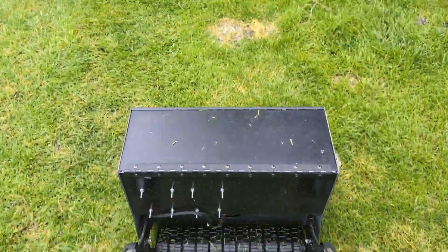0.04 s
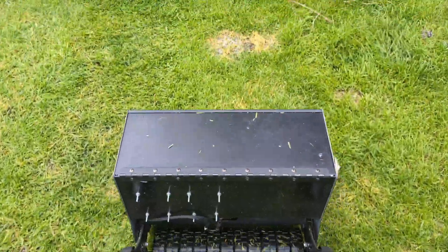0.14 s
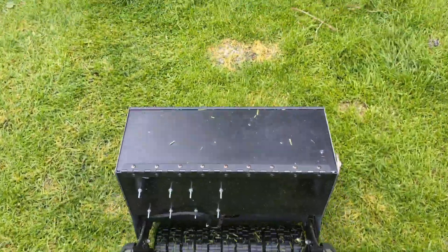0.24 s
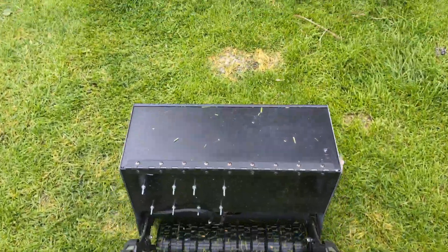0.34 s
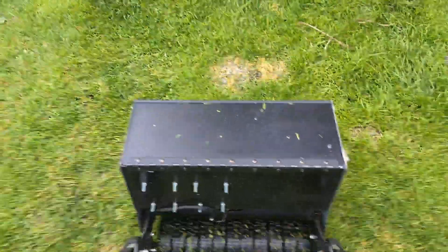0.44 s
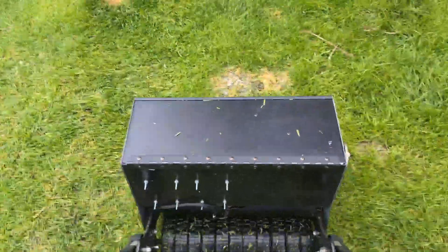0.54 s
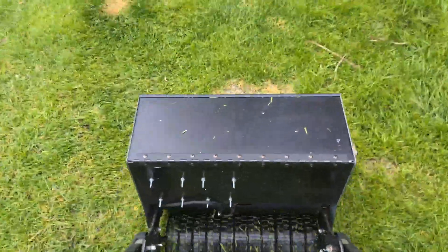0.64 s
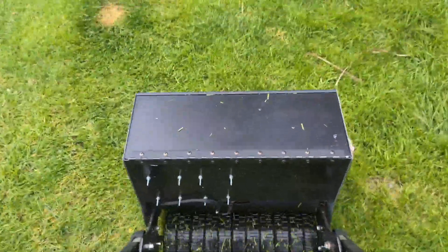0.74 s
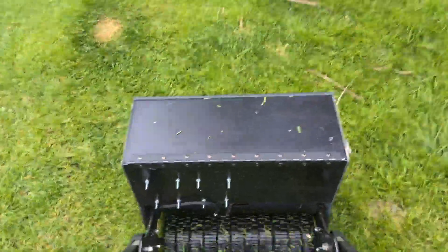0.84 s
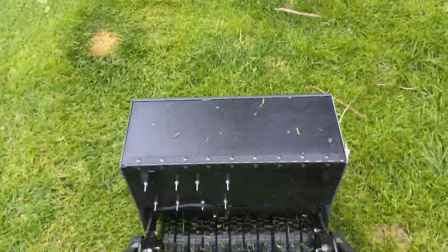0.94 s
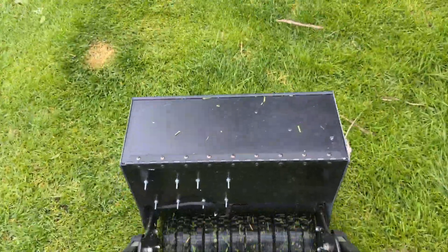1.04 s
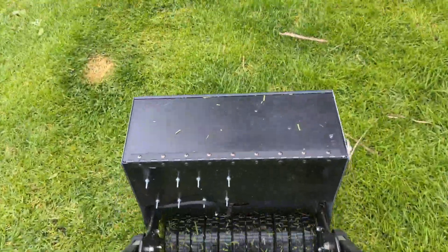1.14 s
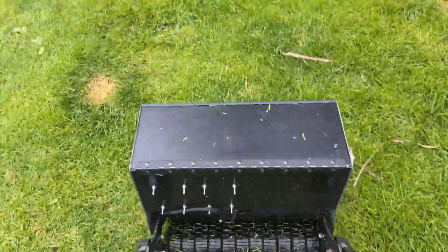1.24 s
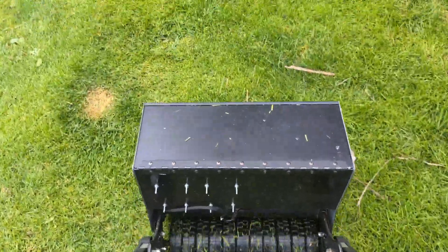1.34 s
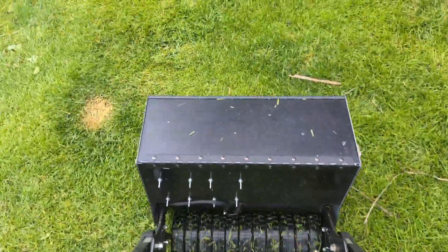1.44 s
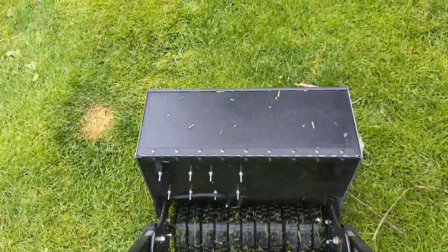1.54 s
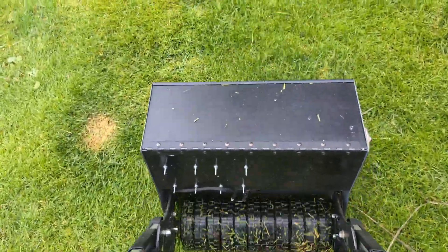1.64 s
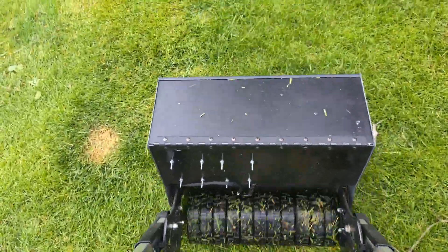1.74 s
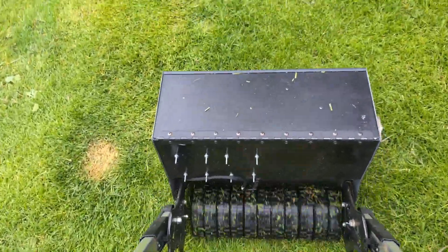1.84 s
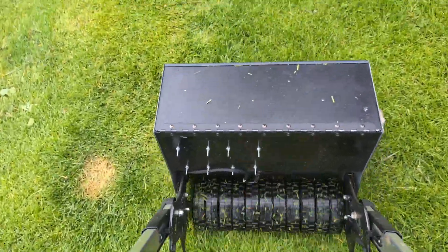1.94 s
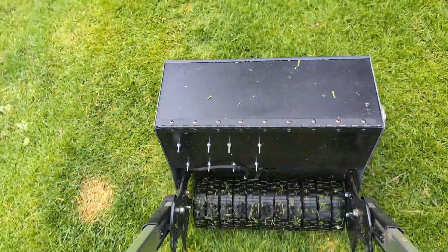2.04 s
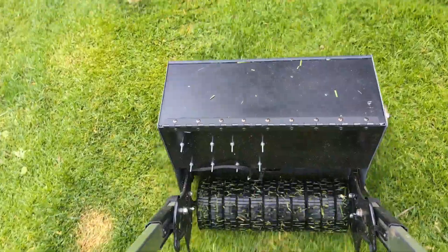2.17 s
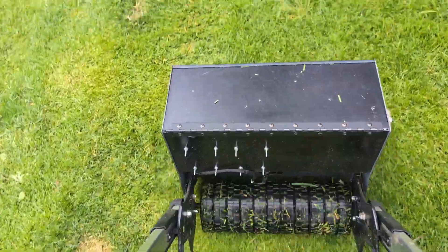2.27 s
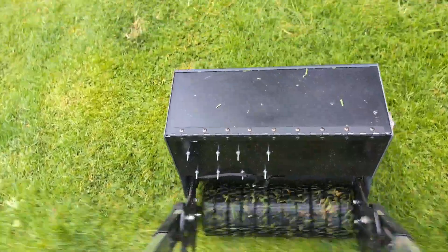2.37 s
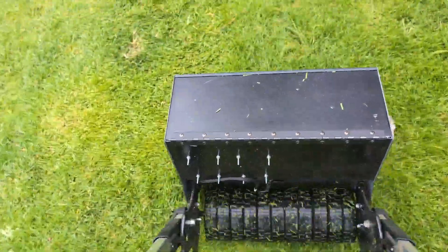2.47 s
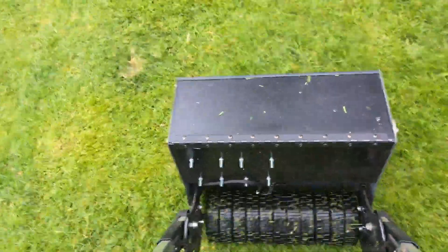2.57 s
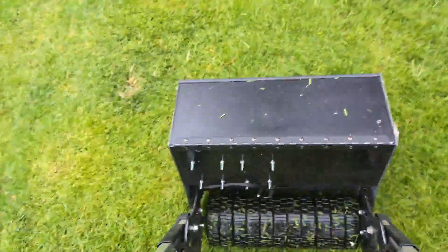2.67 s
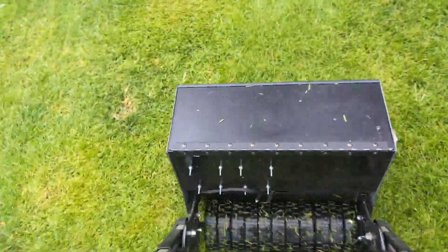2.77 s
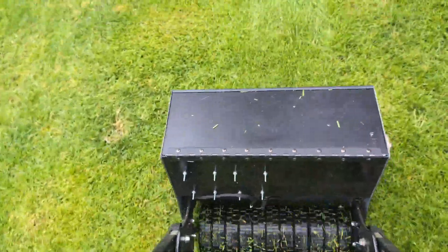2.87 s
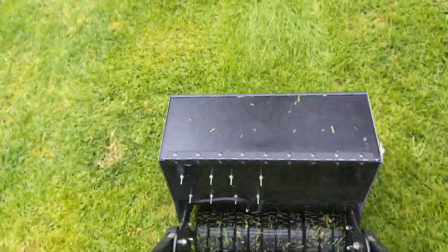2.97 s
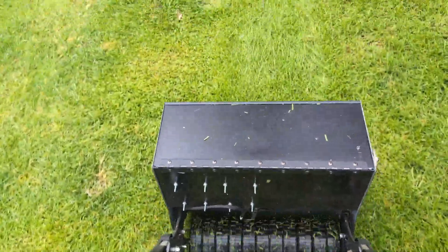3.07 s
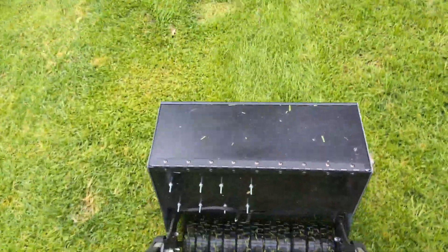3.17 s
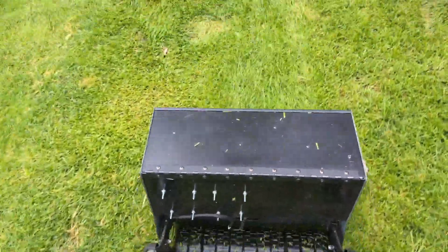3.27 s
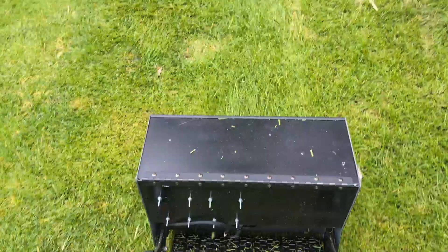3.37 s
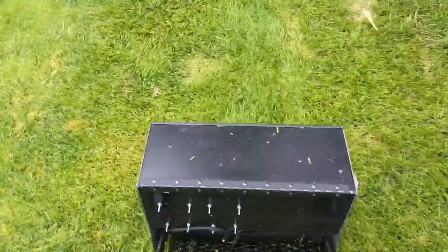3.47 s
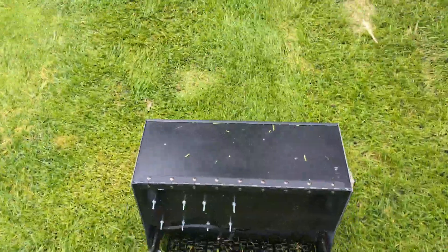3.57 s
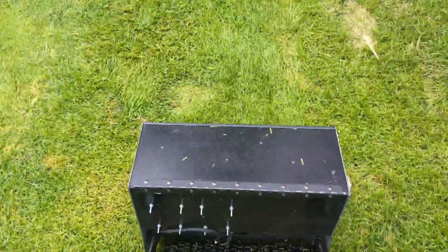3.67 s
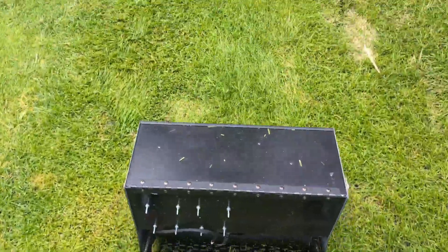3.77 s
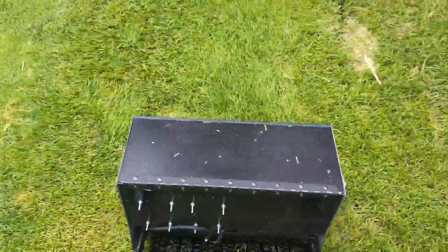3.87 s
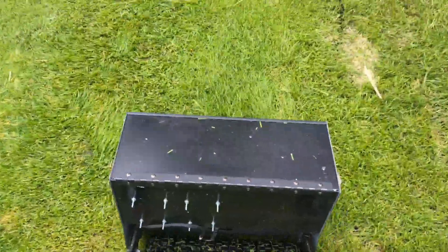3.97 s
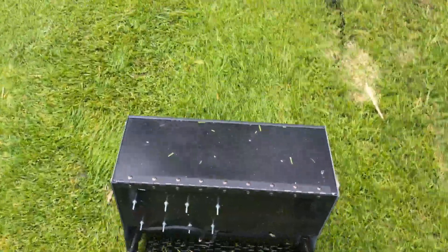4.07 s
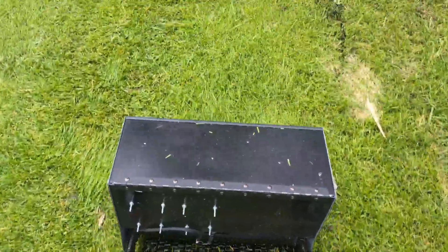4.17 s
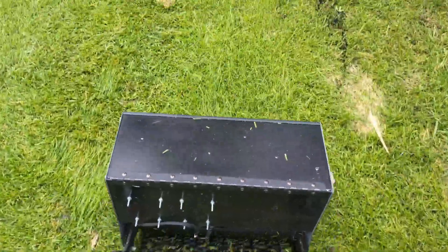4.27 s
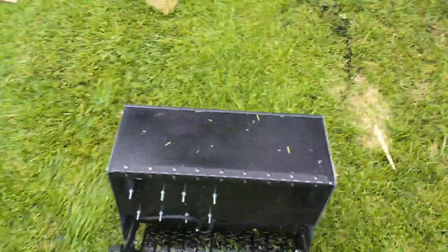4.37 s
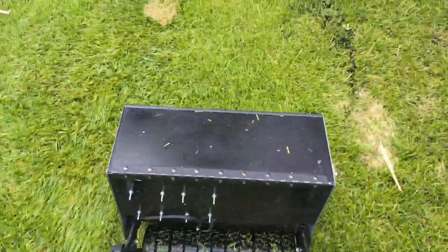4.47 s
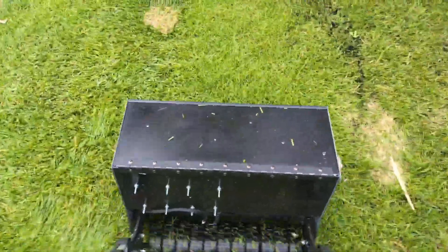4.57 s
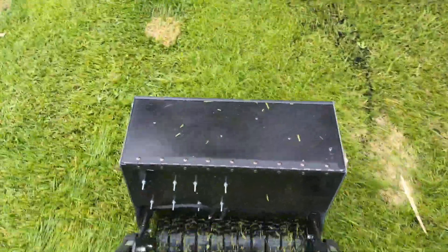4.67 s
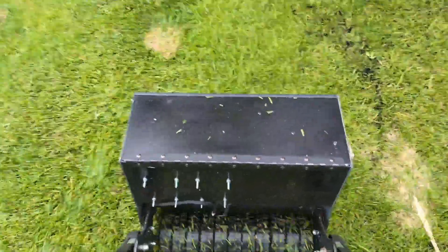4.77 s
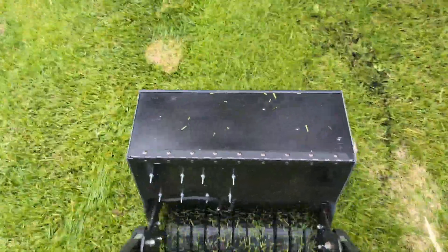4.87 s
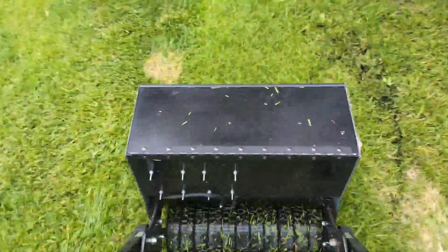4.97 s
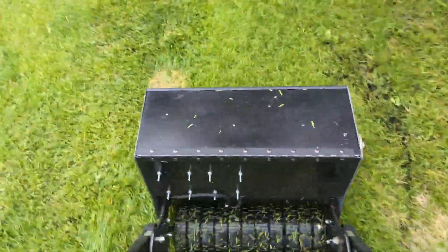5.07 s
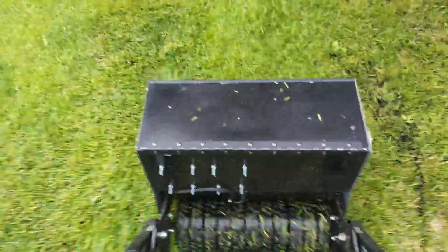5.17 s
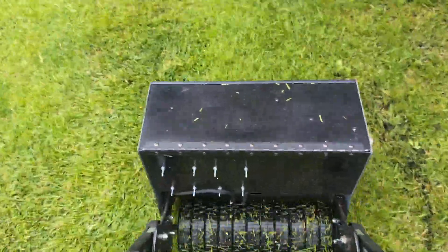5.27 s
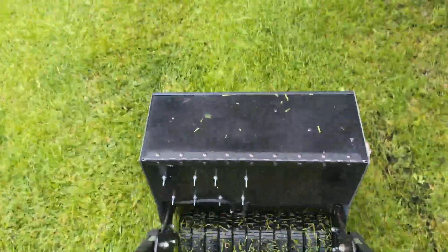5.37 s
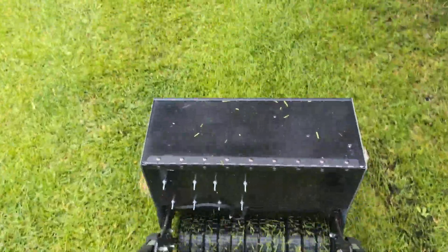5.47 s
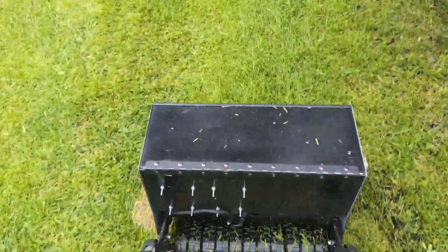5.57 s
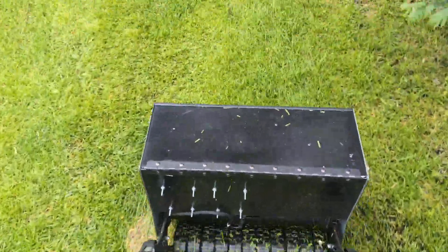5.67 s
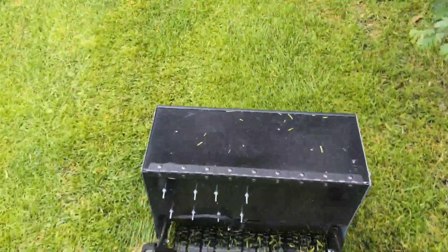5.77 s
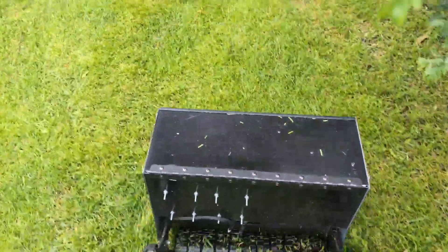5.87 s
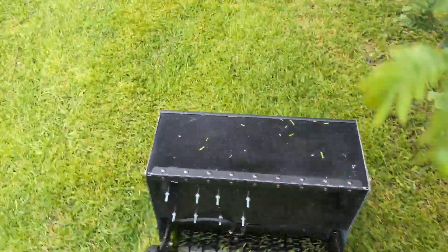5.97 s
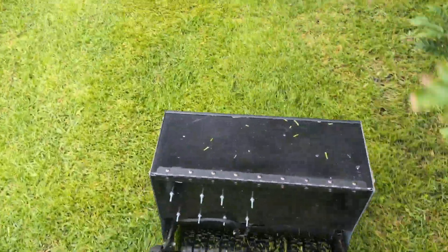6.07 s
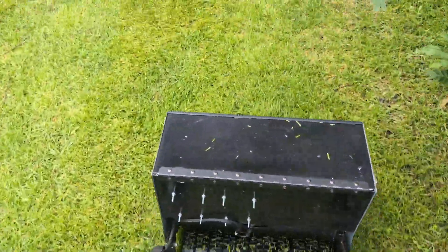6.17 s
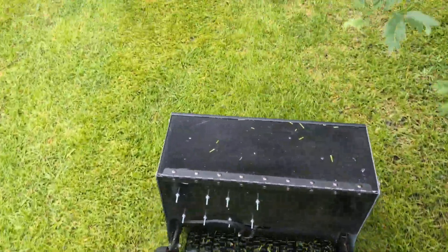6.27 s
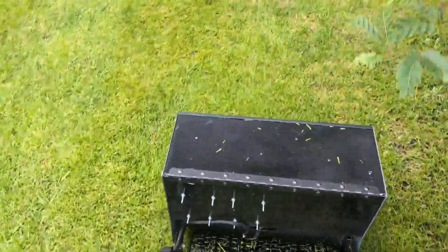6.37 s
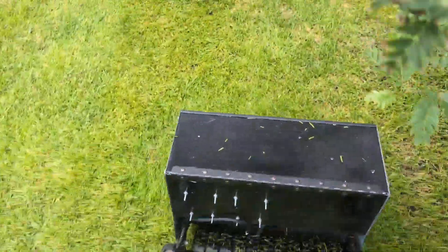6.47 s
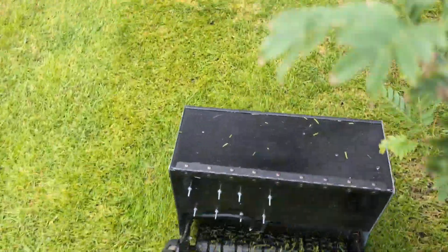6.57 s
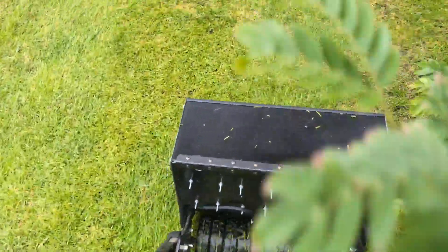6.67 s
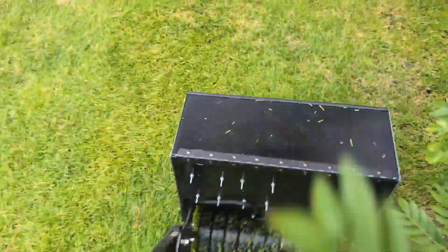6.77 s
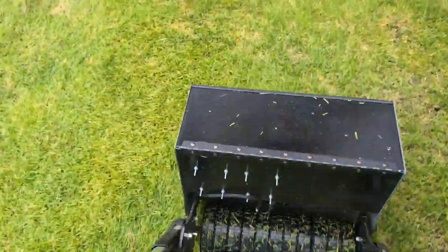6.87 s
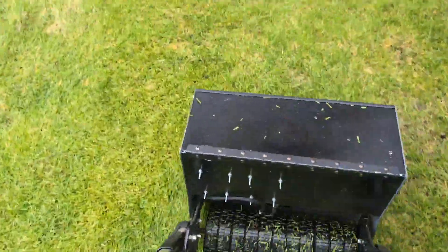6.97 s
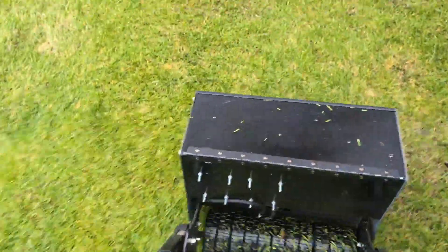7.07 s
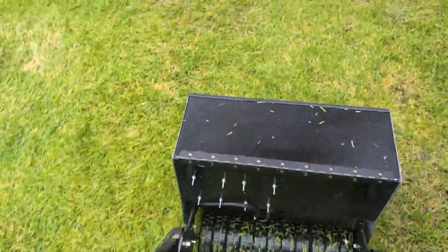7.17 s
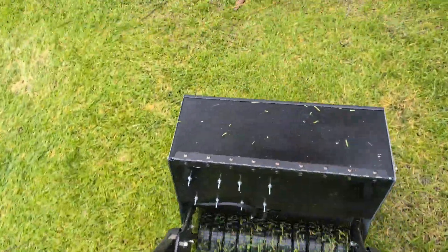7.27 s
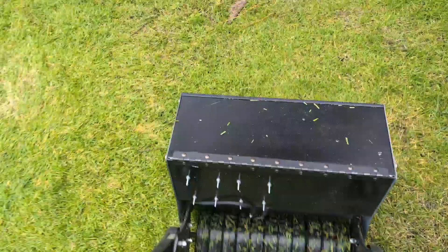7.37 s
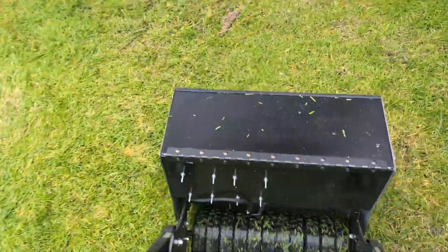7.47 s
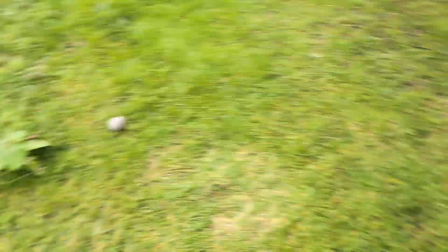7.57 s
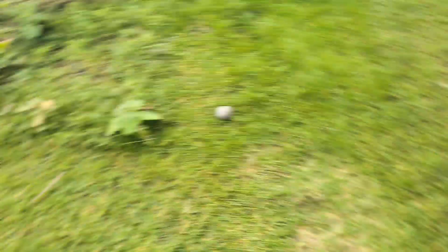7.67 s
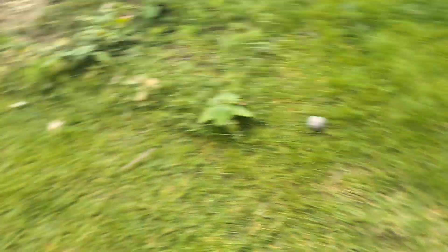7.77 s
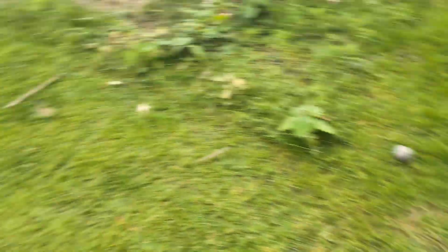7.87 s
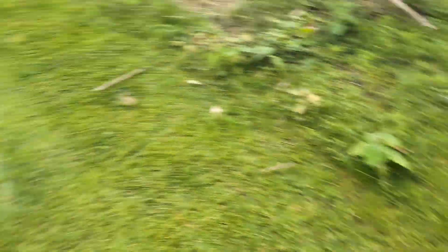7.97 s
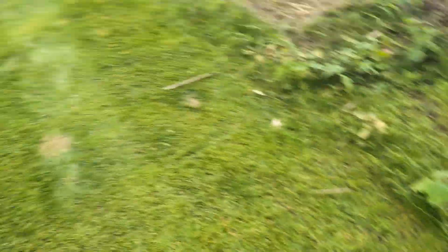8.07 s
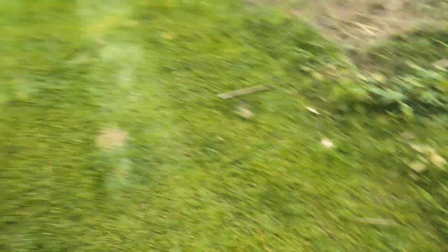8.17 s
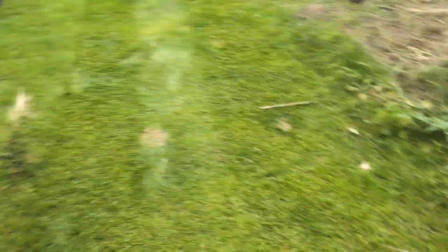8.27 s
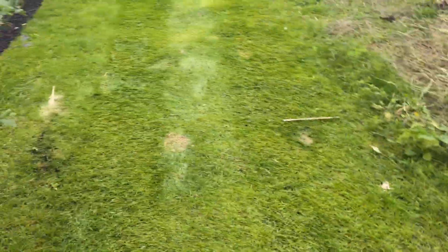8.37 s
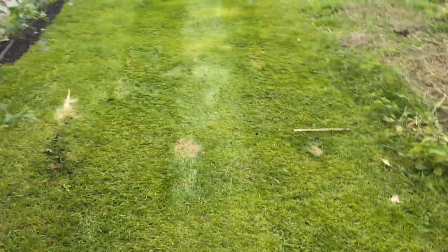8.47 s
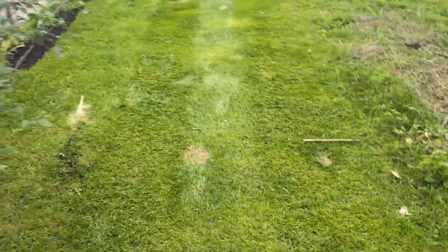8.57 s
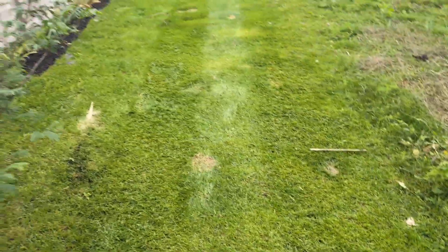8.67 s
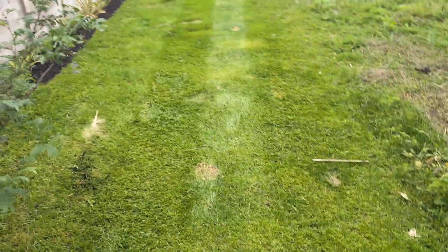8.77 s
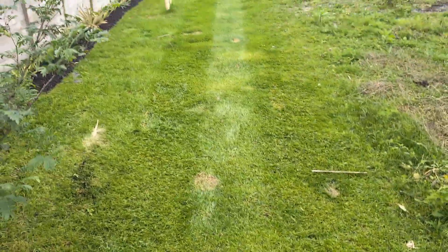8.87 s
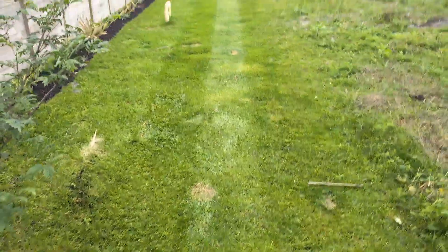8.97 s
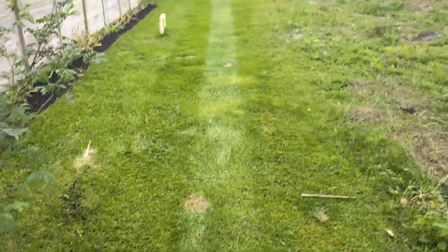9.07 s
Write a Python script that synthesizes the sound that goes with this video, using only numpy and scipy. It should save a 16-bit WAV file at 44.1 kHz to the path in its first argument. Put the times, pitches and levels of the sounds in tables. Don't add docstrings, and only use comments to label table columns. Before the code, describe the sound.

A motor-driven reel mower whirs and rattles loudly over grass, then stops dead with a clack, leaving faint birds and rustling steps.

```python
import sys
import numpy as np
from scipy import signal
from scipy.fft import rfft, irfft
from scipy.io import wavfile
from scipy.ndimage import uniform_filter1d, minimum_filter1d

SR = 44100
rng = np.random.default_rng(int(sys.argv[2]) if len(sys.argv) > 2 else 0)


def gain_from_decibels(decibels):
    exponent = np.asarray(decibels, float) / 20
    return 10 ** exponent


def transcribe(u):
    v = np.clip(np.atleast_2d(u).T, -1, 1)
    q = np.round(v * 32767).astype(np.int16)
    wavfile.write(sys.argv[1], SR, q)


N = 401751
T = np.arange(N) / SR
HZ = np.maximum(np.fft.rfftfreq(8192, 1 / SR), 1)
STOP_S = 7.574
BLADES, TEETH = 5, 13
REEL_HZ = 13.4


def on_hz(points, hz):
    f, v = np.transpose(points)
    return np.interp(np.log(hz), np.log(f), v)


def shape(x, db):
    cepstrum = irfft(db * np.log(10) / 20)
    cepstrum[1:len(HZ) - 1] *= 2
    cepstrum[len(HZ):] = 0
    response = irfft(np.exp(rfft(cepstrum)))[None, :4096]
    return signal.oaconvolve(x, response, axes=1)[:, :N]


def density(count=N):
    return rng.standard_normal((2, count)) * np.sqrt(SR / 2)


def walk(rate):
    k = int(SR / rate)
    held = np.repeat(rng.standard_normal(N // k + 1), k)
    return 0.8 * uniform_filter1d(uniform_filter1d(held, k), k)[:N]


def slope(hz, db_per_octave, low, high):
    return db_per_octave * np.log2(np.clip(hz, low, high) / high)


def swell(at, length):
    return np.exp(-((T - at) / length) ** 2)


# frequency in Hz, gain in dB.
PORT = [(60, 2.5), (400, 0.5), (900, 2), (1200, 8), (1500, 11.5), (2150, 21.5), (2500, 15), (3400, 14.5),
        (4000, 6), (6000, -1.5), (7500, -7), (10000, -17.5), (12500, -21), (15000, -5.5)]
# frequency in Hz, likeness from 0 to 1.
ALIKE = [(40, 0.7), (90, 0.68), (130, 0.97), (600, 0.9), (1100, 0.53), (1500, 0.16), (2200, 0.35),
         (4500, 0), (7000, 0.13), (9000, 0.18), (16000, 0.29)]


def ports(pair, share):
    alike = np.clip(on_hz(ALIKE, HZ), .01, .999)
    colour_db = share * on_hz(PORT, HZ)
    same = shape(pair[:1], colour_db + 20 * np.log10(alike))
    other = shape(pair[1:], colour_db + 10 * np.log10(1 - alike ** 2))
    return np.vstack([pair[:1], same + other])


# frequency in Hz, level in dB per Hz.
YARD = [(30, -79), (50, -69), (120, -73.5), (250, -84), (430, -88.5), (600, -87), (1300, -96),
        (1900, -96.5), (2300, -102), (2800, -103), (3600, -102), (4500, -107), (6000, -112), (9000, -123),
        (15000, -131)]
# time in seconds, stir in dB.
STIR = [
    (7.8, 0),
    (7.9, -3.5),
    (8.3, -2.5),
    (8.42, -1),
    (8.59, 1),
    (8.7, -1),
    (8.9, -2.5),
    (9.11, -2.5),
]
STIR_SHARES = [0.05, 0.1, .8, 1.2]
TURN_DB = [0, -15, 3.5, -2.5]


def yard():
    turn_s, turn_length_s = 8.36, 0.09
    turned = np.clip((T - turn_s) / turn_length_s, 0, 1)
    stir_db = np.interp(T, *np.transpose(STIR))
    flicker_db, flicker_hz = (2.2, 1.5, 1.3, 1.5), (22, 20, 42, 36)
    edges = [1] + [gain_from_decibels(2 * slope(HZ, 28, hz / 4, hz)) for hz in (390, 570, 3000)] + [0]
    out = 0
    for k in range(4):
        part = edges[k] * (1 - edges[k + 1]) + 1e-4
        now_db = STIR_SHARES[k] * stir_db + TURN_DB[k] * turned + flicker_db[k] * walk(flicker_hz[k])
        out = out + shape(density() * gain_from_decibels(now_db), on_hz(YARD, HZ) + 10 * np.log10(part))
    return out * np.where(T < STOP_S, gain_from_decibels(-5.0), 1)


# start in seconds, length in seconds, first pitch in Hz, level in dB.
NEAR_BIRD = [(7.75, .08, 3070, -61), (7.83, .1, 3080, -67), (7.935, .045, 3100, -62),
             (7.98, .03, 3030, -65), (8.002, .085, 3130, -63), (8.09, .08, 3110, -69),
             (8.21, .03, 3060, -69), (8.233, 0.04, 3020, -58), (8.29, .05, 3080, -66),
             (8.33, .05, 3040, -61), (8.39, .05, 3110, -67)]
# start in seconds, length in seconds, first pitch in Hz, level in dB.
FAR_BIRD = [
    (7.855, 0.1, 3520, -66),
    (7.965, .035, 3560, -70),
    (8.0, .06, 3500, -73),
    (8.07, .05, 3800, -74),
    (8.157, .022, 3850, -64),
    (8.175, .05, 3480, -66),
    (8.258, 0.045, 3560, -68),
]
# fall per note in Hz, left minus right in dB.
NEAR_VOICE = (80, -2)
FAR_VOICE = (200, -3)


def bird():
    count = 8820
    t = T[:count]
    out, warble, flutter = np.zeros((2, N + count)), walk(220), walk(82.0)
    notes = [(*row, *NEAR_VOICE) for row in NEAR_BIRD]
    notes += [(*row, *FAR_VOICE) for row in FAR_BIRD]
    notes.append((9.08, .06, 1620, -56, 10., -8))
    for start, length, hz0, db, fall, pan_db in notes:
        i, u = int(start * SR), np.clip(t / length, 0, 1)
        hz = hz0 - fall * u + 65 * np.roll(warble, i)[:count]
        side_db = np.array([[pan_db], [-pan_db]]) / 2
        size = gain_from_decibels(db + side_db + 3.2 * np.roll(flutter, i)[:count]) * np.sin(np.pi * u) ** .5
        out[:, i:i + count] += size * np.sin(2 * np.pi * np.cumsum(hz) / SR)
    echoes = rng.standard_normal((2, count)) * gain_from_decibels(-29.0 - 60 * t / 0.31)
    echoes[:, 0] = 1
    return signal.oaconvolve(out, echoes, axes=1)[:, :N]


# start in seconds, level in dB, length in seconds, centre frequency in Hz.
RUSTLE = [(7.592, -41, 0.017, 2500), (7.62, -40.5, .005, 3300), (7.658, -36, .005, 3450),
          (8.095, -56, .011, 1100), (8.09, -66, .01, 3800), (8.33, -67, .06, 4300), (8.234, -47, .005, 900),
          (8.44, -61, .02, 1500), (8.4595, -54, .003, 3800), (8.46, -47, 0.004, 1800),
          (8.48, -43, .003, 2200), (8.493, -59, .03, 3600), (8.49, -53, .02, 900), (8.487, -52, 0.03, 2100),
          (8.508, -52, .004, 2500), (8.515, -45, .012, 850), (8.55, -55.5, .012, 3200),
          (8.569, -40, .004, 3000), (8.571, -37, .005, 2200), (8.569, -43, .006, 9000),
          (8.577, -41.5, .01, 3300), (8.581, -42, .01, 1100), (8.582, -38, .008, 2000),
          (8.592, -47, .006, 2300), (8.599, -42, .003, 8950), (8.6, -43, .004, 2600),
          (8.602, -46, .008, 3300), (8.62, -62, .04, 3000), (8.645, -60, .03, 3500),
          (8.66, -54, .015, 3300), (8.679, -61, .03, 3500), (8.699, -57, .03, 2000),
          (8.702, -48, .008, 1000), (8.718, -62, .03, 3600), (8.745, -62, .02, 3700), (8.8, -69, .05, 3820)]


def rustle():
    out = np.zeros((2, N))
    t = np.arange(4410) / SR
    for start, db, length, hz in RUSTLE:
        width, i = .8 * hz, int(start * SR)
        grain_db = 2.8 * np.repeat(rng.standard_normal(147), 30)
        grain = rng.standard_normal((2, len(t))) * gain_from_decibels(grain_db) * np.exp(-t / length)
        b, a = signal.iirpeak(hz, hz / width, SR)
        scrape = signal.lfilter(np.convolve(b, b), np.convolve(a, a), grain)
        out[:, i:i + len(t)] += gain_from_decibels(db) * np.sqrt(SR / 3 / width) * scrape
    return out


# frequency in Hz, level in dB per Hz.
BODY = [(40, -72.5), (110, -69.5), (135, -63), (300, -58), (375, -63.5), (520, -54), (750, -54), (960, -57),
        (1200, -58), (1500, -60.5), (2200, -62), (3000, -64), (3800, -65), (4500, -65), (7300, -68.5),
        (11000, -64)]
# frequency in Hz, width in Hz, lift in dB.
FRAME = [(144.5, 12, 12), (380, 22, -0.5), (687, 71, 3), (818, 17, 6.5), (972, 52, -3), (1157, 106, 6),
         (1745, 66, 4), (2017, 37, 4), (1350, 44, -1), (2143, 18, 6), (2200, 30, -2), (2293, 155, 5.5),
         (2430, 35, 2.5), (3260, 17, 4), (3377, 30, 6.5), (3560, 40, -2.5), (4145, 78, 4.5), (4860, 75, 6),
         (5580, 88, 3.5), (7000, 470, -1.5), (7450, 50, 1.5), (9400, 80, 0.5), (10100, 120, 0),
         (12600, 560, -4), (14900, 4300, -10.5)]


def frame_response():
    modes = sum(db / (1 + (2 * (HZ - f) / w) ** 2) for f, w, db in FRAME)
    return on_hz(BODY, HZ) + modes


# frequency in Hz, time to fall 60 dB in seconds.
TAIL_T60 = [
    (100, 0.59),
    (500, 0.36),
    (2000, 0.46),
    (10000, 0.41),
]
# start in seconds, frequency in Hz, level in dB,
# time to fall 60 dB in seconds, time of damping in seconds.
RING = [
    (7.574, 905, -55, 2.4, 7.97),
    (7.574, 1840, -58, .9, 7.87),
    (7.574, 2280, -50, .35, 7.75),
    (7.588, 2600, -27, .055, 7.66),
    (7.574, 180, -38, .5, 7.8),
    (7.6, 260, -40, .4, 7.75),
]


def ring_out(body_db):
    out, t = np.zeros((2, N)), T[T > STOP_S] - STOP_S
    for hz in 62.5 * 2. ** np.arange(9):
        band = -12 * np.log2(HZ / hz) ** 2
        echo_db = body_db + band - 15.0 + slope(hz, -5.0, 60, 2460)
        echo = shape(density(len(t)), echo_db)[:, :len(t)]
        out[:, -len(t):] += echo * gain_from_decibels(-60 * t / on_hz(TAIL_T60, hz))
    for start, hz, db, t60, end in RING:
        t = T - start
        alive = (t > 0) * np.clip((end - T) / 0.095, 0, 1)
        decay_db = db - 60 * np.maximum(t, 0) / t60 + 2.9 * walk(30)
        out += alive * gain_from_decibels(decay_db) * np.sin(2 * np.pi * hz * t)
    return ports(out, share=0.78)


# time in seconds, second chain harmonic in Hz,
# machine level in dB, grass thickness in dB.
LAWN = [(0.0, 347.9, 0, -1), (1.158, 350.4, -0.5, -2), (1.701, 348, 1, -2.5), (2.201, 347.1, 1, -2.5),
        (2.42, 346.4, 0.5, -2.5), (2.7, 348.2, 0, -2), (3.179, 347.1, 0, -2.5), (4.65, 346.4, 1, -6),
        (4.85, 345.8, 0, -4), (5.8, 347.2, 1, -6), (7.05, 349.1, -0.1, -2.5), (7.57, 347.6, 1, -4)]
# time in seconds, extra swish in dB, extra spray of clippings in dB.
TUFTS = [(0.02, 3.5, 2), (.2, 3, 1), (0.471, 3.5, 4), (.63, 3, 5.5), (.67, 3, -1), (1.34, 3.5, 4),
         (2.1, 3, 2), (2.23, 2, 4), (2.391, 4.5, 2), (2.58, 4.5, 4), (4.78, 0, 0.5), (7.05, -3, 0)]


def controls():
    s, *columns = np.transpose(LAWN)
    hz, level_db, thick_db = (np.interp(T, s, c) for c in columns)
    tuft_length_s, bog_share = 0.029, 0.25
    bells = np.array([swell(at, tuft_length_s) for at, _, _ in TUFTS])
    tuft_db, spray_db = np.transpose(TUFTS)[1:] @ bells
    hop_db = -5.5 * swell(2.305, 0.018)
    level_db = level_db - bog_share * tuft_db + hop_db + 0.86 * walk(7)
    hiss_db = thick_db + tuft_db + .5 * walk(9) - .3 * hop_db
    air_db = -1 + spray_db + 1.5 * walk(11) - hop_db
    return hz, level_db, hiss_db, air_db


# time in seconds, multiple of reel speed,
# level in dB, length in seconds.
SING = [(.24, 160, -37, 0.051), (1.35, 160, -37, .04), (1.497, 170, -41, 0.1), (1.58, 55, -30, .05),
        (1.64, 160, -44, .04), (1.95, 55, -28, .04), (2.03, 170, -50, .08), (2.22, 160, -44, 0.054),
        (2.42, 55, -29, 0.14), (2.48, 110, -35, .06), (2.8, 160, -41, 0.06), (2.983, 60, -34, .05),
        (3.13, 160, -38, 0.082), (3.35, 81.25, -43, 0.056), (3.752, 160, -38, 0.085),
        (4.724, 160, -32.5, 0.059), (5.35, 81.25, -39, .05), (5.42, 160, -38, .06), (5.79, 110, -30, .06),
        (6.152, 160, -45, 0.071), (6.75, 60, -32, .05), (7.15, 160, -40, .08), (7.285, 52, -26, .05)]


def sing(turns):
    out, flutter = np.zeros((2, N)), gain_from_decibels(3.3 * walk(70))
    for at, multiple, db, length in SING:
        near = slice(max(int((at - .3) * SR), 0), int((at + .3) * SR))
        phase = 2 * np.pi * multiple * turns[near]
        size = np.sqrt(2) * gain_from_decibels(db) * swell(at, length)[near] * flutter[near]
        left = np.sin(phase)
        right = gain_from_decibels(on_hz(PORT, multiple * REEL_HZ)) * np.sin(phase - multiple * 0.0088)
        out[:, near] += size * np.array([left, right])
    return out


def tones(turns, table, waver_db):
    out = np.zeros((2, N))
    for multiple, db in table:
        phase = (2 * np.pi * ((multiple * turns + rng.random()) % 1)).astype(np.float32)
        size = np.sqrt(2) * gain_from_decibels(db + waver_db * walk(13))
        out[0] += size * np.sin(phase)
        right_gain = gain_from_decibels(on_hz(PORT, multiple * REEL_HZ))
        out[1] += size * right_gain * np.sin(phase - np.float32(multiple * 0.0083))
    return out


# multiple of reel speed, level in dB.
CHAIN = [(13, -38), (26, -30.5), (39, -33.5), (52, -32), (65, -39.5), (78, -54), (91, -42.5)]
MOTOR = [(3.25, -88), (6.5, -68), (9.75, -56), (16.25, -51), (29.25, -49), (32.5, -44), (45.5, -40),
         (48.75, -62), (55.25, -65), (68.25, -57), (81.25, -38), (84.5, -44.5)]
REEL = [(20, -67.5), (24, -40), (40, -34.5), (45, -40), (55, -44), (60, -38.5), (90, -39.5), (105, -47),
        (110, -39), (120, -44.5), (125, -44), (155, -48.5), (165, -61), (170, -45.5), (175, -52),
        (190, -47.5), (210, -51), (240, -49), (245, -60), (250, -72)]


def drive_tones(turns):
    chain = tones(turns, CHAIN, waver_db=-1.5)
    motor = tones(turns, MOTOR, waver_db=5.5)
    return chain + motor + tones(turns, REEL, waver_db=3.5)


def beats(turns, count, start, decay):
    place = count * (turns - start) + count
    return np.exp(-(place % 1) / decay), place.astype(int)


def chain_links(turns):
    link, index = beats(turns, TEETH, .06, decay=0.57)
    return link * gain_from_decibels(2.44 * rng.standard_normal(2000)[index])


def clipping_spray():
    sizes = gain_from_decibels(np.minimum(2.5 * rng.exponential(size=N), 12))
    hits = uniform_filter1d((rng.random(N) < 300 / SR) * sizes, size=90)
    return signal.lfilter([1], [1, -np.exp(-1 / (0.0017 * SR))], hits)


# level in dB, in order round the reel.
BLADE_DB = [-0.5, -4, 2, 1, -3.5]


def blade_snips(turns):
    snips = 0
    for start, db in [(.11, -0.3), (.148, -0.58)]:
        snip, index = beats(turns, BLADES, start, decay=0.13)
        force_db = db + np.array(BLADE_DB)[index % BLADES] + 2.0 * rng.standard_normal(2000)[index]
        snips = snips + uniform_filter1d(snip, size=30) * gain_from_decibels(force_db)
    return snips


def mower(body_db):
    hz, level_db, hiss_db, air_db = controls()
    turns = np.cumsum(hz / (2 * TEETH)) / SR
    snips, links, clippings = blade_snips(turns), chain_links(turns), clipping_spray()
    burrs = density(3300)
    repeat = burrs[:, (turns % 1 * 3299.9).astype(int)]

    low = slope(HZ, 14.6, 124, 487)
    bass = shape(density() * gain_from_decibels(1.0 * walk(16)), body_db + 10 * np.log10(1.001 - gain_from_decibels(2 * low)))

    rub_db = body_db + low - slope(HZ, 2.7, 2600, 4130) - 1.5
    rub = shape(density() * gain_from_decibels(-4 + 2.8 * walk(45)), rub_db)

    chain_db = body_db + low - slope(HZ, 5.64, 816, 4350) - 9.5
    chain = shape(density() * links * gain_from_decibels(1.5), chain_db)

    strike = (0.81 * density() + 0.68 * repeat) * snips
    cut_db = body_db + slope(HZ, 7.2, 724, 2320) - slope(HZ, 6.46, 3670, 8200) - 7.0
    cut = shape(strike * gain_from_decibels(4.5 + .5 * hiss_db), cut_db)

    grass_db = body_db + slope(HZ, 18.6, 2580, 3580) - slope(HZ, 18.5, 5910, 10800) - 12.5
    grass = shape(density() * gain_from_decibels(2.08 * hiss_db) * (0.56 + .25 * clippings), grass_db)

    spray_db = body_db + slope(HZ, 15.5, 4160, 6100) - 0.5
    spray = shape(density() * gain_from_decibels(air_db) * (0.69 + .2 * clippings), spray_db)

    noise = ports(bass + rub + chain + cut + grass + spray, share=0.98)
    lines = drive_tones(turns) + sing(turns)
    running = np.clip((STOP_S - T) / 0.00085, 0, 1)
    return (noise + lines) * gain_from_decibels(level_db - 1.78) * running


def scene():
    body_db = frame_response()
    around = ports(yard() + rustle(), share=0.61)
    return around + bird() + ring_out(body_db) + mower(body_db)


def roll_off(x):
    return signal.sosfilt(signal.butter(12, 15500, fs=SR, output="sos"), x)


def record(dry):
    dry = signal.sosfilt(signal.butter(4, 43, "high", fs=SR, output="sos"), dry)
    right = signal.sosfilt(signal.ellip(10, .3, 70, 15120, fs=SR, output="sos"), dry[1])
    dry = np.array([dry[0], right])
    need = np.minimum(.97 / np.maximum(np.abs(dry).max(axis=0), 1e-9), 1)
    gain = uniform_filter1d(minimum_filter1d(need, size=441), size=221)
    return roll_off(dry * gain)


dry = scene()
out = record(dry)
transcribe(out)
```